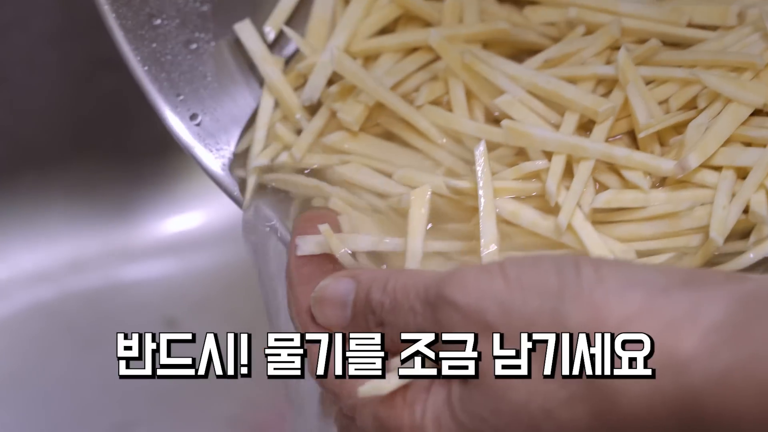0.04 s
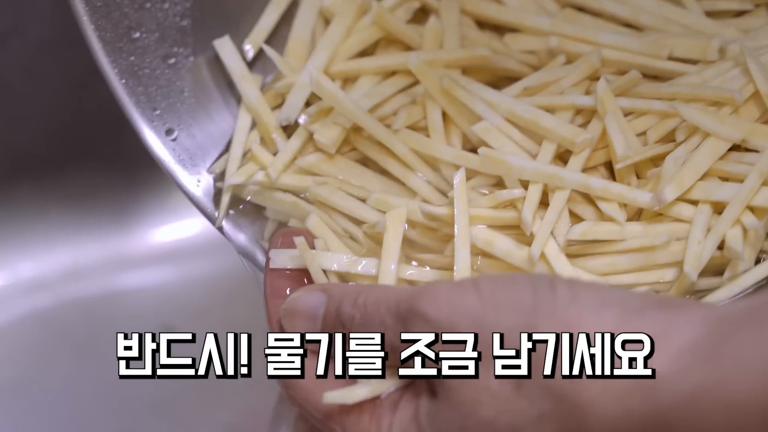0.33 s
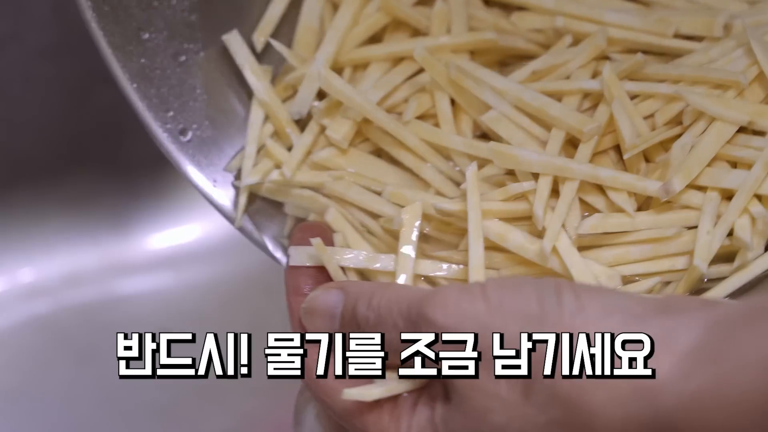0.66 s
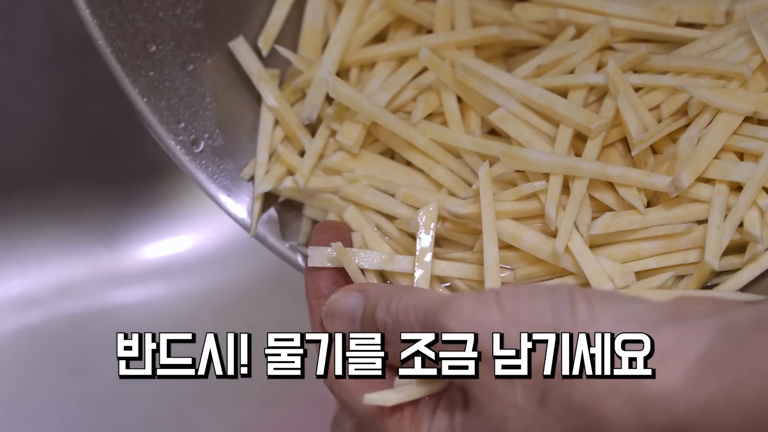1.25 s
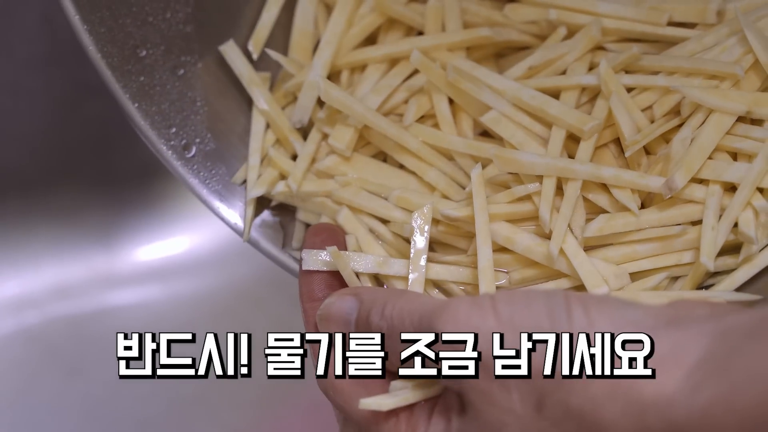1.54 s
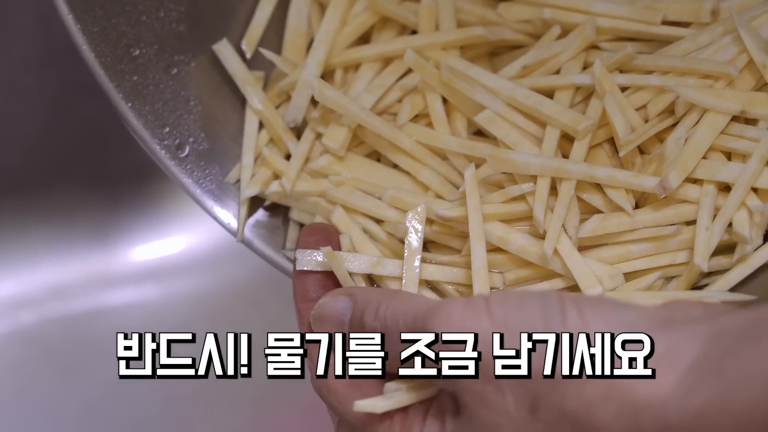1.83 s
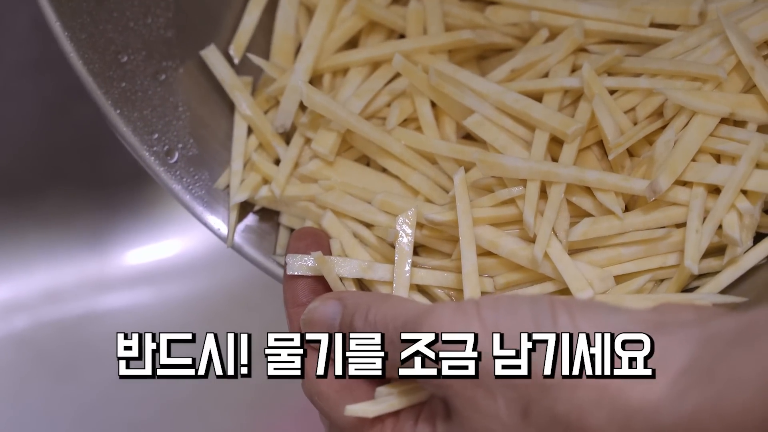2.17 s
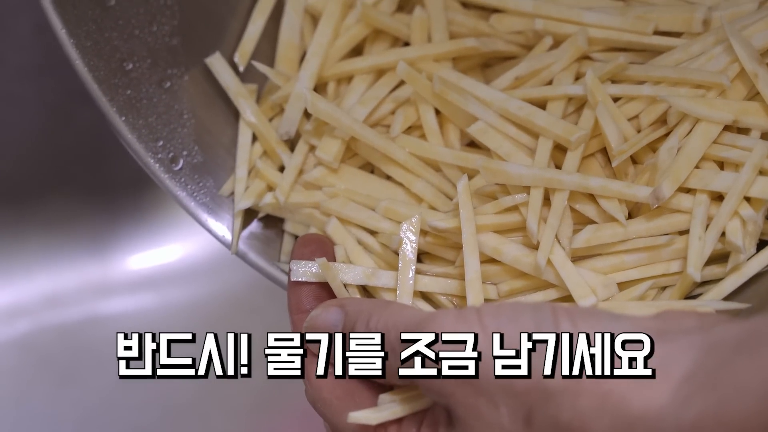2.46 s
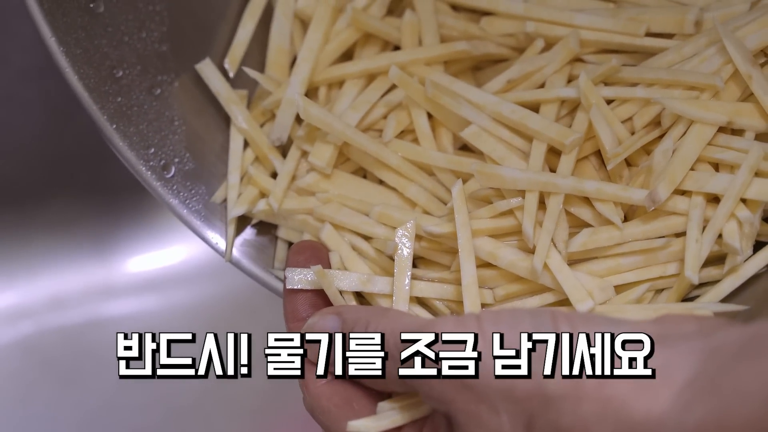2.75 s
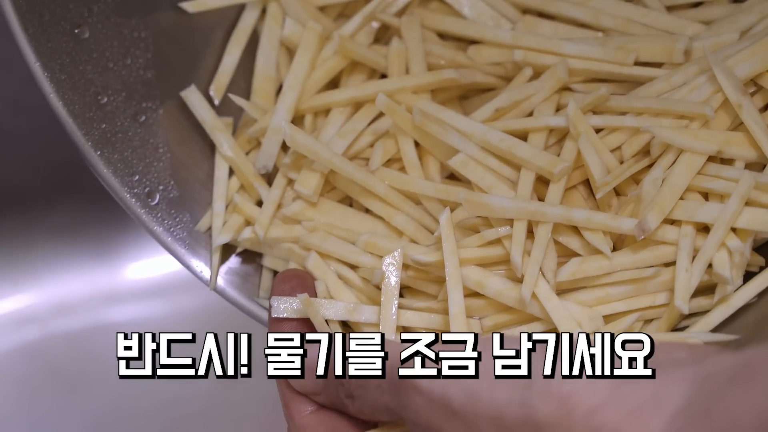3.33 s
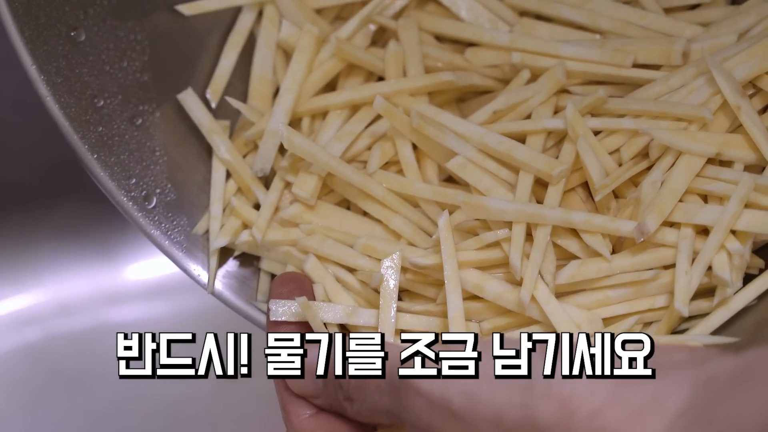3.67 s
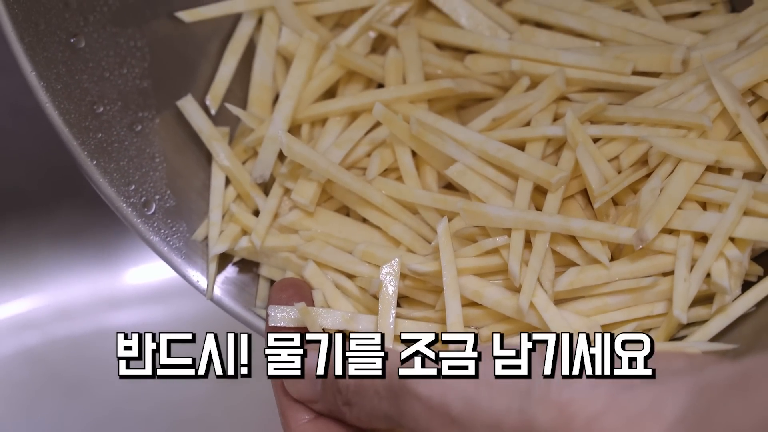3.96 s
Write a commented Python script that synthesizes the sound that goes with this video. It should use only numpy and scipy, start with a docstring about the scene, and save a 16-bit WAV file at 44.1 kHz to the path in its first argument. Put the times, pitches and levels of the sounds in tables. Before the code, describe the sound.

Heard up close in a quiet kitchen, water splashes from a bowl onto the floor of a metal sink. Low glugs come from the drain with a hollow drumming, before the stream dwindles to light ticks and a few fat drops.

```python
"""Water is poured off from a tilted metal bowl of cut potatoes into a steel kitchen sink, heard close by. At
first the stream spatters, traps resonating bubbles and drums on the basin. From 0.5 s an air pocket warbles in
the drain; from 1.3 s to 2 s slugs of water thump into the drain and sink in deep glugs and the drumming peaks.
Then the flow thins to bright ticks and a few fat drops. Throughout, basin walls and kitchen reflect the sound."""
import sys
import numpy as np
from scipy import signal
from scipy.fft import rfft, irfft
from scipy.io import wavfile
from scipy.ndimage import uniform_filter1d

SR = 44100
rng = np.random.default_rng(int(sys.argv[2]) if len(sys.argv) > 2 else 0)


def master(y):
    """Save y as 16-bit WAV."""
    cut = np.clip(np.atleast_2d(y).T, -1, 1)
    pcm = np.round(cut * 32767)  # scale
    wavfile.write(sys.argv[1], SR, pcm.astype(np.int16))


N = 176400
T = np.arange(N) / SR


def undb(db):
    """Amplitude ratio of a level in decibels; all levels here are relative."""
    return 10 ** (np.asarray(db) / 20)


def unit(x):
    """Normalisation to rms 1."""
    return x / np.sqrt(np.mean(x ** 2))


def curve(table, column=1):
    """Linear interpolation of a table column over time."""
    rows = np.array(table)
    return np.interp(T, rows[:, 0], rows[:, column])


def decay(t60, size):
    """Exponential damping: the level falls 60 dB in t60 seconds."""
    return np.exp(-np.log(1000) * T[:size] / t60)


def convolve(x, response):
    """Convolution: the output of a linear system with this impulse response."""
    return signal.fftconvolve(x, response)[:N]


def bandpass(x, low_hz, high_hz, order=2):
    """Band-pass filtering, with the upper edge held below half the sample rate."""
    edges = [low_hz, min(high_hz, SR / 2 - 1)]
    return signal.sosfilt(signal.butter(order, edges, "bandpass", fs=SR, output="sos"), x)


def colour(x, spectrum):
    """Minimum-phase filtering through (frequency [Hz], level [dB]) points."""
    hz, db = np.array(spectrum).T
    bins = np.fft.rfftfreq(2048, 1 / SR) + 1
    gain = undb(np.interp(np.log(bins), np.log(hz), db))
    cepstrum = irfft(np.log(gain))
    half = len(cepstrum) // 2
    cepstrum[1:half] *= 2  # folding the cepstrum makes the filter causal
    cepstrum[half + 1:] = 0
    return convolve(x, irfft(np.exp(rfft(cepstrum))))


def wander(rate):
    """Random modulation: smoothed noise at rms 1, with `rate` new values a second."""
    step = int(SR / rate)
    noise = np.interp(np.arange(N) / step, np.arange(4000), rng.standard_normal(4000))
    return unit(uniform_filter1d(noise, step))


def impacts(rate, spread_db):
    """Shot noise: impulses of random size, `rate` a second, with mean power independent of rate."""
    hit = rng.random(N) < rate / SR
    size = undb(spread_db * np.clip(rng.standard_normal(N), -2, 2))
    return hit * size / np.sqrt(rate)


def add(out, at_s, sound):
    """Superposition of a short sound at a given time."""
    start = int(at_s * SR)
    out[start:start + len(sound)] += sound[:N - start]


def bubble(hz, cycles, glide, rise):
    """Bubble resonance: builds over `rise` periods; over `cycles` it dies and sharpens by `glide`."""
    periods = np.arange(int(SR * cycles / hz) + 2) * hz / SR
    envelope = (1 - np.exp(-periods / rise)) * np.exp(-np.log(1000) * periods / cycles)
    phase = periods + glide * periods ** 2 / (2 * cycles)
    return envelope / envelope.max() * np.sin(2 * np.pi * phase)


def swarm(rate, low_hz, high_hz, cycles, glide, spread_db):
    """Incoherent sum of bubble resonances, spread evenly in log frequency, at rms 1."""
    out, sizes, pitch = np.zeros(N), impacts(rate, spread_db), rng.random(N)
    for i in np.flatnonzero(sizes):
        hz = low_hz * (high_hz / low_hz) ** pitch[i]
        add(out, i / SR, sizes[i] * np.sqrt(hz) * bubble(hz, cycles, glide, rise=1))
    return unit(out)


def burst(hz, width, t60):
    """Impact transient: damped noise in the band from hz / width to hz * width."""
    size = SR // 8
    noise = bandpass(rng.standard_normal(size), hz / width, hz * width, order=1)
    return unit(noise) * decay(t60, size)


# spectrum of the quiet kitchen (frequency [Hz], level [dB])
AMBIENT_SPECTRUM = [(20, -27), (40, -12), (110, -13.5), (200, -2.5), (500, -13.5), (1200, -17.5),
                    (3000, -27), (16000, -34)]
def ambience():
    """Stationary noise forms the faint background of the kitchen."""
    return undb(-50) * unit(colour(rng.standard_normal(N), AMBIENT_SPECTRUM))


def reflections(x):
    """Reverberation in basin and kitchen; each call draws the echoes of another spot in the sink."""
    size = SR // 3

    def tail(t60, delay_s, band_hz):
        echoes = rng.standard_normal(size) * decay(t60, size) * (T[:size] > delay_s)
        return bandpass(echoes / np.linalg.norm(echoes), *band_hz)
    basin = undb(-1) * tail(t60=0.039, delay_s=0.0019, band_hz=(495, SR / 2))
    room = undb(-4) * tail(t60=0.17, delay_s=0.0095, band_hz=(214, 2360))
    room_treble = undb(-12.5) * tail(t60=0.22, delay_s=0.012, band_hz=(2600, 14000))
    return convolve(x, basin + room + room_treble)


# modes of the steel basin (frequency [Hz], level [dB], 60 dB decay time [s])
BASIN_MODES = [(105.3, -3.5, 1), (177, -8, 0.1), (251.4, 0, 0.11), (267.5, -1, 0.14), (318, -2.5, 0.15),
               (373, -7, 0.27), (395.9, -2.5, 0.15), (499, -6, 0.044), (571, -4.5, 0.22),
               (639, -19.5, 0.17), (848, -13.5, 0.6), (948, -22, 0.078), (1113, -4, 0.15)]
def basin_ring():
    """Modal superposition: the basin's impulse response is a sum of damped sines, at unit energy."""
    size = SR // 2
    ring = sum(undb(db) * decay(t60, size) * np.sin(2 * np.pi * hz * T[:size])
               for hz, db, t60 in BASIN_MODES)
    return ring / np.linalg.norm(ring)


# low rumble of sink and kitchen (frequency [Hz], level [dB])
RUMBLE_SPECTRUM = [(15, -28), (24, -7), (40, -16), (100, -5), (160, 0.5), (400, -22), (1500, -38),
                   (16000, -64)]
# drumming on the sink floor (time [s], level [dB])
DRUMMING = [(0, -38), (.15, -32.5), (.6, -32), (1.25, -31.5), (1.36, -17.5), (1.44, -25), (1.55, -22),
            (1.65, -25.5), (1.76, -20.5), (1.81, -28.5), (1.95, -22.5), (2.06, -36), (2.2, -36.5),
            (2.6, -42.5), (2.8, -42), (3.05, -47), (3.3, -47), (3.7, -39), (4, -50.5)]
def drumming():
    """Forced vibration: falling water excites the basin's modes and a low rumble."""
    taps = impacts(curve(STREAM), spread_db=6.5) * rng.choice([-1, 1], N)
    dull_taps = signal.sosfilt(signal.butter(1, 700, fs=SR, output="sos"), taps)
    ring = unit(convolve(dull_taps, basin_ring()))
    rumble = undb(-3) * unit(colour(taps, RUMBLE_SPECTRUM))
    return (ring + rumble) * undb(curve(DRUMMING) - 1)


# air pocket in the drain (time [s], frequency [Hz], level [dB])
WARBLE = [(.5, 175, -56), (.58, 187.8, -23), (.62, 191.4, -30), (.69, 196, -17), (.75, 185.5, -37),
          (.81, 174.4, -21), (.89, 171.6, -42), (.96, 179.4, -18.5), (1.0, 179.5, -19.5),
          (1.05, 181.5, -32), (1.13, 174.5, -35), (1.19, 187.8, -23), (1.3, 202.8, -34)]
def warble():
    """An air pocket oscillates in the drain with random frequency and amplitude modulation."""
    hz = curve(WARBLE) * (1 + 0.08 * wander(rate=80))
    level_db = curve(WARBLE, column=2) + 2.5 * wander(rate=80)
    sounding = (T > WARBLE[0][0]) & (T < WARBLE[-1][0])
    return sounding * np.sin(2 * np.pi * np.cumsum(hz) / SR) * undb(level_db)


# slugs of water thumping into the drain (time [s], frequency [Hz], level [dB], ring length [cycles])
GLUGS = [(1.288, 290, -12, 5.3), (1.322, 376, -12.5, 20), (1.345, 178, -9, 5), (1.366, 247, -6.5, 6.8),
         (1.389, 286, -4, 6.4), (1.45, 262, -9, 6), (1.462, 296, -6, 6.6), (1.52, 367, -12, 5.2),
         (1.557, 330, -22, 8), (1.581, 626, -17.5, 18), (1.598, 685, -28, 19), (1.616, 268, -9.5, 8.9),
         (1.666, 267, -5, 4.4), (1.707, 392, -15.5, 29), (1.712, 605, -24, 30), (1.742, 270, -12, 5),
         (1.754, 313, -10, 4.1), (1.828, 248, -7, 10.8), (1.872, 273, -7, 3), (1.913, 363, -12, 13),
         (1.927, 260, -5, 5.7), (1.946, 313, -15.5, 8.4), (1.965, 400, -20.5, 13)]
def glugs():
    """Slugs of water thump into the drain and sink; each thump is a low damped tone that sets the basin
    ringing."""
    gulps = np.zeros(N)
    for at, hz, db, cycles in GLUGS:
        add(gulps, at, undb(db) * bubble(hz, cycles, glide=0.083, rise=0.55))
    ring = np.std(gulps) * unit(convolve(gulps, basin_ring()))
    return gulps + undb(-5) * ring


# fat drops and large bubbles (time [s], frequency [Hz], level [dB], ring length [cycles])
PLOPS = [(.066, 1090, -17, 14), (.126, 890, -19, 11), (.191, 1080, -17.5, 17), (.328, 1180, -16, 7.4),
         (.348, 1016, -11, 15), (.483, 1060, -15, 12.5), (.52, 2160, -19.5, 50), (.669, 1230, -18.5, 24),
         (.706, 1260, -17.5, 31), (.735, 2160, -19.5, 44), (.758, 1240, -10.5, 5.4), (.8, 2060, -16.5, 13),
         (.861, 1200, -14.5, 9), (.89, 800, -23.5, 27), (.936, 1280, -21.5, 18), (.973, 1044, -20.5, 18),
         (1.034, 1120, -18, 12), (1.057, 1170, -21, 6.4), (1.19, 1103, -27.5, 88), (1.277, 1144, -18, 43),
         (1.31, 897, -14, 12), (1.399, 1046, -16.5, 25), (1.468, 1090, -11, 11), (1.521, 1140, -15.5, 23),
         (1.543, 1380, -25, 20), (1.574, 1034, -18.5, 14), (1.665, 1140, -22, 14), (1.76, 1087, -15.5, 16),
         (1.929, 1130, -9.5, 5.8), (2.08, 2220, -22, 12), (2.187, 1700, -20, 11), (2.21, 1680, -20.5, 6.4),
         (2.328, 1400, -33, 14), (3.15, 1160, -22.5, 7), (3.154, 1780, -19.5, 42), (3.593, 1060, -25, 11),
         (3.644, 1000, -24, 12), (3.655, 1170, -17, 9), (3.68, 1110, -16.5, 8.5), (3.703, 920, -19, 6.4),
         (3.732, 810, -31, 36), (3.785, 1170, -22, 12), (3.798, 2060, -20.5, 14), (3.849, 976, -16.5, 9.1)]
# small droplets (time [s], frequency [Hz], level [dB], ring length [cycles])
TICKS = [(.021, 3700, -20, 28), (.458, 3960, -10, 41), (.469, 4350, -16.5, 38), (1.283, 7900, -13, 52),
         (1.474, 8600, -20, 25), (1.497, 8530, -16.5, 50), (1.511, 6300, -21, 45), (1.646, 7160, -22, 52),
         (1.715, 8600, -23, 57), (1.964, 4200, -10, 13), (2.058, 4700, -25, 35), (2.154, 6050, -22.5, 27),
         (2.359, 6000, -22.5, 25), (2.556, 8500, -22, 35), (2.638, 8700, -20.5, 56),
         (2.691, 6830, -14.5, 43), (2.712, 8720, -15.5, 50), (2.845, 6330, -24.5, 22),
         (2.894, 6400, -24.5, 45), (2.914, 4900, -25, 82), (3.026, 6850, -24.5, 28), (3.09, 5540, -28, 18),
         (3.15, 4650, -29.5, 11), (3.22, 8240, -36, 33), (3.254, 6320, -30, 22), (3.416, 3060, -19.5, 8.9),
         (3.536, 7050, -24, 17), (3.565, 8600, -23, 18), (3.603, 4250, -26.5, 30), (3.734, 8360, -24, 160),
         (3.797, 4550, -25, 15), (3.956, 3640, -32, 25)]
def drops(table, glide, rise, slap_db):
    """Impact and air entrainment: each drop slaps the wet steel and leaves a ringing bubble."""
    out = np.zeros(N)
    for at, hz, db, cycles in table:
        add(out, at, undb(db) * bubble(hz, cycles, glide, rise))
        add(out, at, undb(db + slap_db) * burst(hz, width=1.48, t60=0.021))
    return out


# spectrum of the puddle's bubbles (frequency [Hz], level [dB])
BUBBLE_SPECTRUM = [(300, -15), (520, -10.5), (690, -8), (880, -3), (1200, -1.5), (1650, -10), (2200, -2.5),
                   (2800, -22), (6000, -12)]
# bubbling in the puddle (time [s], level [dB])
BUBBLING = [(0, -34.5), (.08, -32), (.4, -33), (.55, -34.5), (.75, -30), (.9, -37), (1.05, -30),
            (1.15, -36), (1.38, -32), (1.58, -33.5), (1.82, -36.5), (1.95, -37.5), (2.08, -43.5),
            (2.2, -42), (2.4, -49), (2.75, -49.5), (3.05, -57), (3.55, -45.5), (3.69, -45.5), (3.77, -41.5),
            (4, -47.5)]
def bubbling():
    """Air entrainment: the stream traps bubbles in the puddle, each ringing at its own frequency."""
    bubbles = swarm(0.55 * curve(STREAM), low_hz=407, high_hz=2764, cycles=18.4, glide=0.22, spread_db=5)
    return unit(colour(bubbles, BUBBLE_SPECTRUM)) * undb(curve(BUBBLING) - 3.5)


# lumps of water landing (time [s], level [dB], centre frequency [Hz])
SPLATS = [(0.0822, -11, 3600), (0.1329, -12, 4740), (0.162, -7.5, 4930), (0.19, -9, 3940),
          (0.208, -15, 6400), (0.3132, -13.5, 4500), (0.4249, -16, 3680), (0.5038, -12, 8500),
          (0.7087, -12, 6900), (0.7966, -10, 6590), (0.816, -8.5, 4760), (1.0855, -12, 3120),
          (1.1032, -10.5, 4490), (1.2103, -11.5, 3750), (1.2477, -16.5, 4890), (1.4952, -22, 5020),
          (1.5414, -27, 8200), (1.995, -22, 6310), (2.1758, -18.5, 5540), (2.243, -19, 8650),
          (2.2707, -22, 4660), (2.36, -28, 6320), (2.465, -16.5, 4570), (2.5218, -27, 4630),
          (2.747, -21, 8360), (3.5349, -34, 7520), (3.9564, -22, 3560)]
def splats():
    """Break-up on impact: lumps of water burst on the sink floor into a crackle of droplets."""
    out, rise_s = np.zeros(N), 0.0021
    for at, db, hz in SPLATS:
        spray = burst(hz, width=1.16, t60=0.054)
        attack = 1 - np.exp(-T[:len(spray)] / rise_s)
        add(out, at, undb(db - 8) * spray * attack)
    crackle = undb(4.5 * wander(rate=700))
    return colour(out * crackle, SPATTER_SPECTRUM)


# spectrum of splashes, fizz and splats (frequency [Hz], level [dB])
SPATTER_SPECTRUM = [(300, -49), (1200, -4.5), (2700, -8.5), (3900, -5), (5600, -4), (8400, -1), (10500, -9),
                    (13500, -6), (16000, -14)]
def splashes(rate, spread_db):
    """Incoherent bursts of spray add in power; each droplet size sounds in its own band."""
    out = np.zeros(N)
    for band_hz in [(300, 3000), (3000, 5500), (5500, 9500), (8500, 17000)]:
        power = convolve(impacts(rate, spread_db) ** 2, decay(t60=0.0075, size=SR // 20))
        out += bandpass(np.sqrt(np.abs(power)) * rng.standard_normal(N), *band_hz)
    return unit(colour(out, SPATTER_SPECTRUM))


# the falling stream (time [s], base impact rate [1/s], spatter level [dB])
STREAM = [(0, 3260, -29), (.18, 2250, -28), (.28, 2250, -30.5), (.45, 2280, -29), (.57, 1570, -29.5),
          (.8, 2100, -31.5), (.92, 1660, -31.5), (1.2, 1670, -32), (1.4, 1080, -33.5), (1.55, 1000, -31),
          (1.8, 710, -34), (1.96, 920, -33.5), (2.12, 800, -40), (2.47, 890, -38.5), (2.6, 430, -41.5),
          (2.75, 315, -39.5), (2.82, 270, -45.5), (3.15, 245, -46.5), (3.55, 240, -45), (3.75, 203, -53.5),
          (4, 176, -46)]
def spatter():
    """Jet break-up: the stream lands in uneven spurts as two layers, spray and tiny fizzing bubbles."""
    rate = curve(STREAM)
    spray = splashes(0.63 * rate, spread_db=9)
    bubbles = swarm(0.9 * rate, low_hz=2422, high_hz=11320, cycles=30, glide=0.12, spread_db=12.5)
    fizz = unit(colour(bubbles, SPATTER_SPECTRUM))
    spurts_db = 1.8 * wander(rate=110)
    flow = undb(curve(STREAM, column=2) + spurts_db - 6.5)
    return spray * flow, fizz * flow


def scene():
    """Superposition of the water, its reflections, the drumming basin and the quiet kitchen."""
    plops = drops(PLOPS, glide=0.1, rise=0.54, slap_db=-13)
    ticks = undb(-2) * drops(TICKS, glide=0.035, rise=1, slap_db=-11)
    water = [*spatter(), splats(), bubbling(), warble() + glugs(), plops, ticks]
    return (ambience() + sum(x + reflections(x) for x in water) + drumming())[None]


def record(dry):
    """Band limiting: steep filters remove the deepest bass and the highest treble."""
    low_hz, high_hz = 33, 15800
    dry = signal.sosfilt(signal.butter(6, low_hz, "highpass", fs=SR, output="sos"), dry)
    return signal.sosfilt(signal.ellip(10, 0.2, 80, high_hz, fs=SR, output="sos"), dry)


dry = scene()
out = record(dry)
master(out)
```